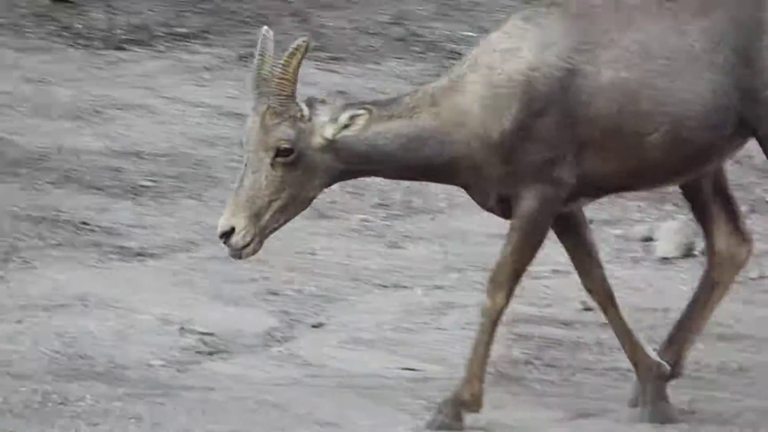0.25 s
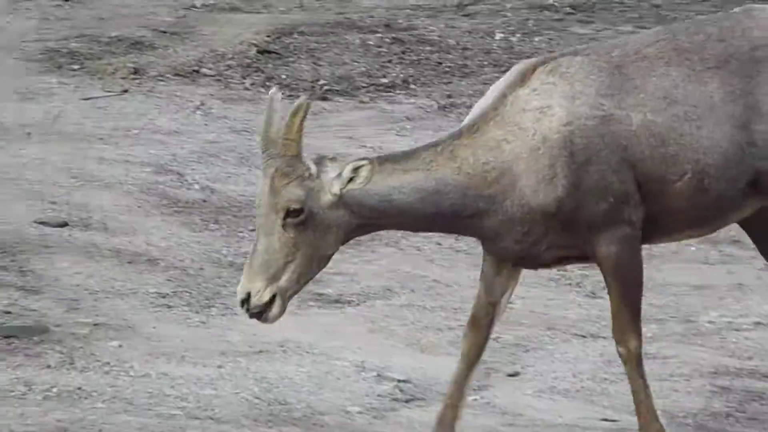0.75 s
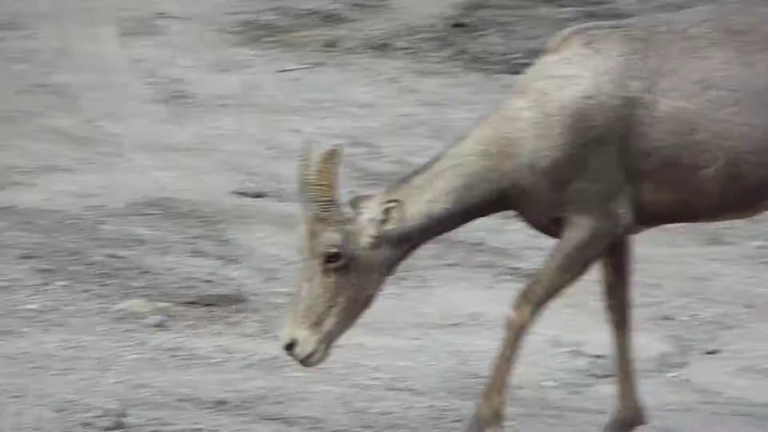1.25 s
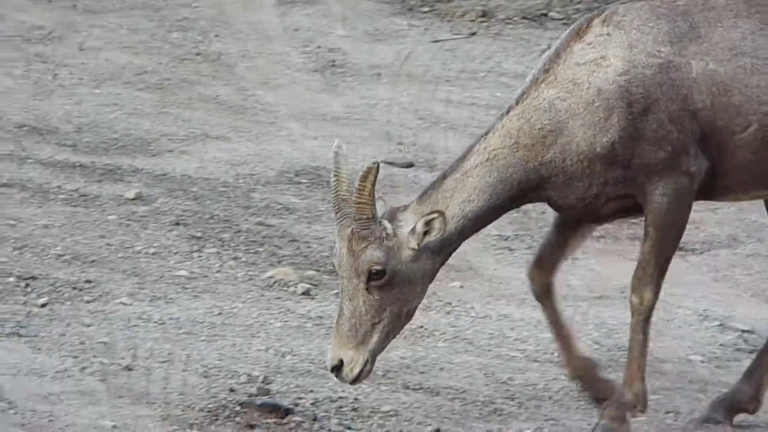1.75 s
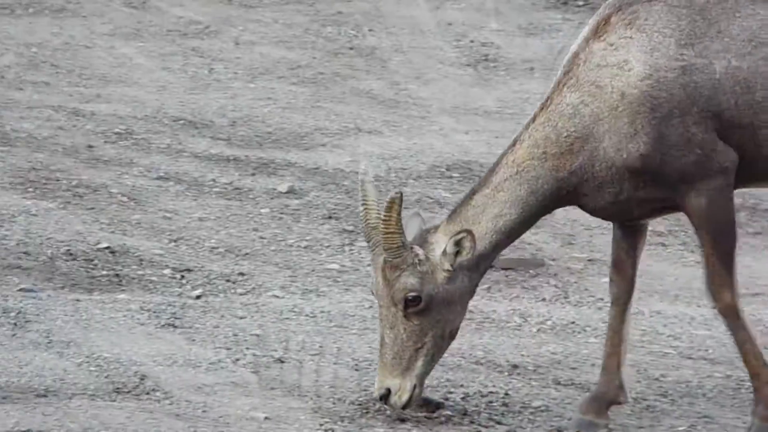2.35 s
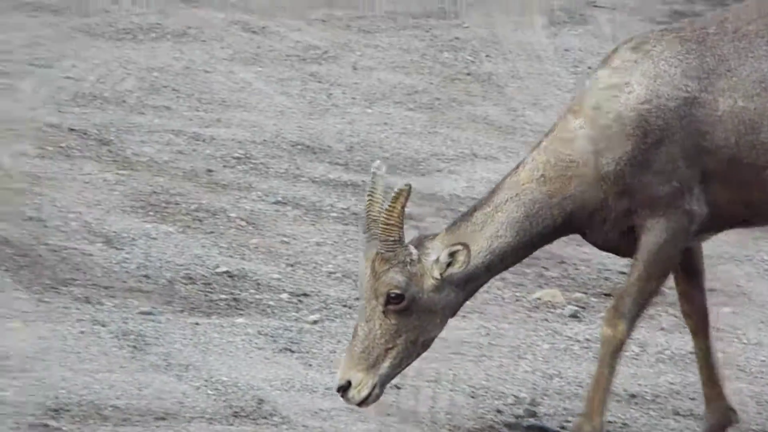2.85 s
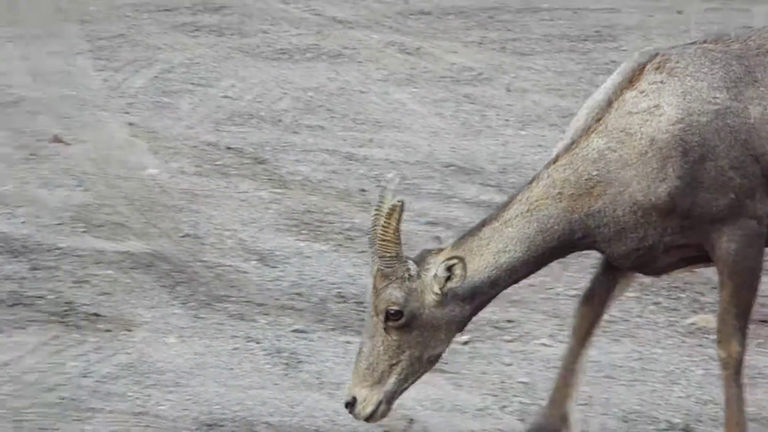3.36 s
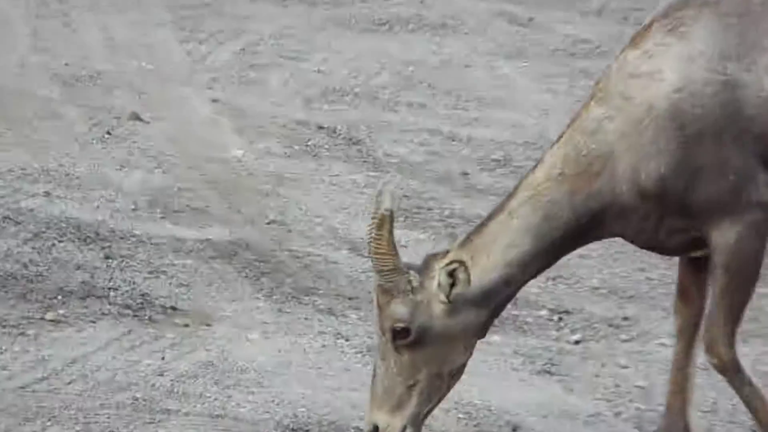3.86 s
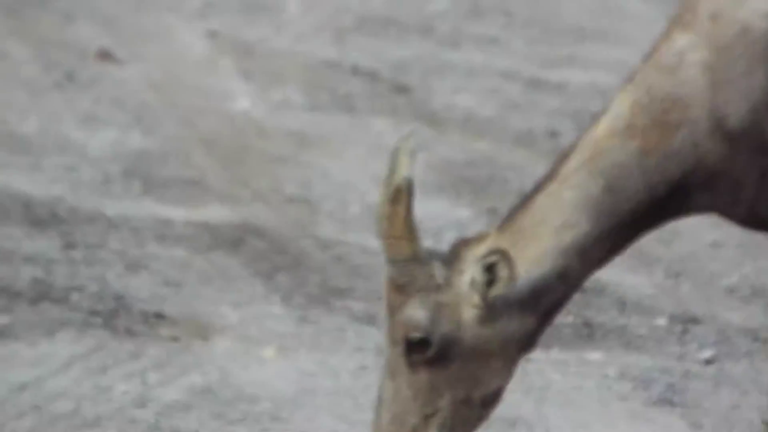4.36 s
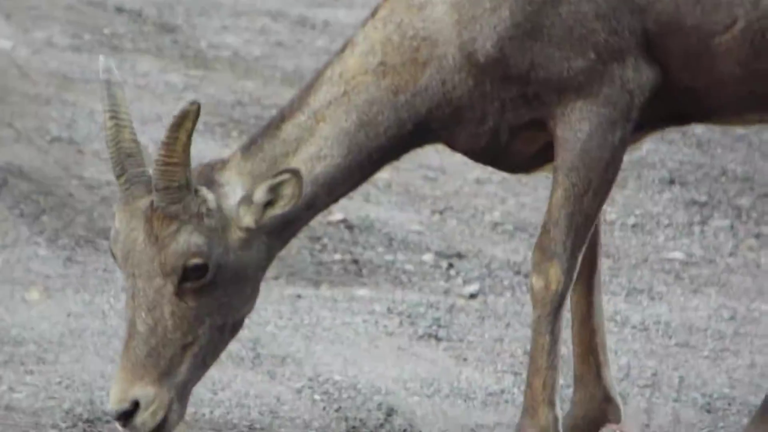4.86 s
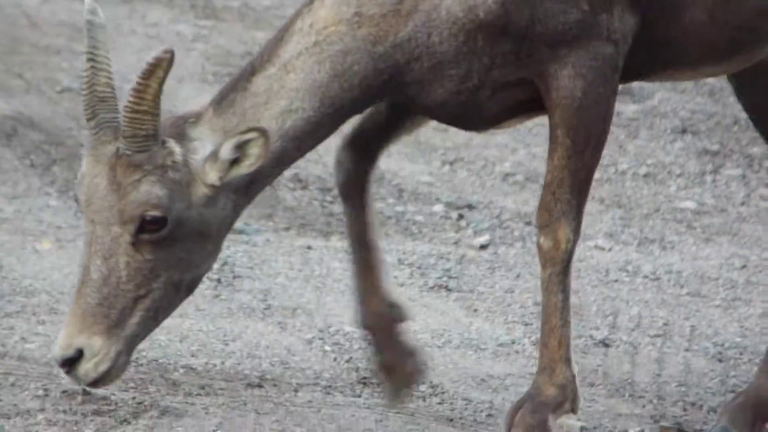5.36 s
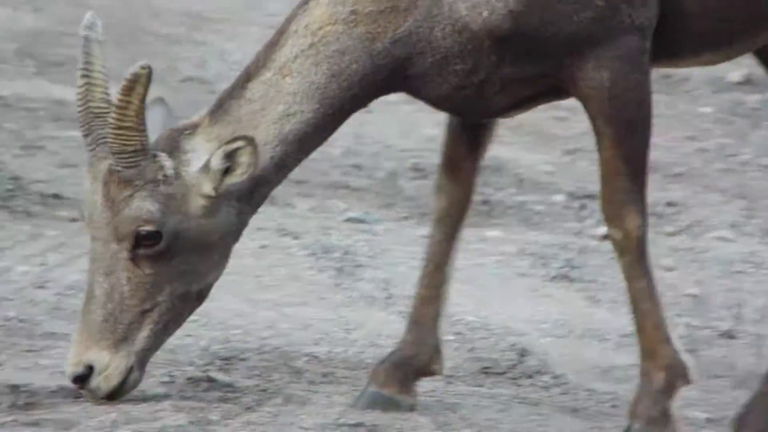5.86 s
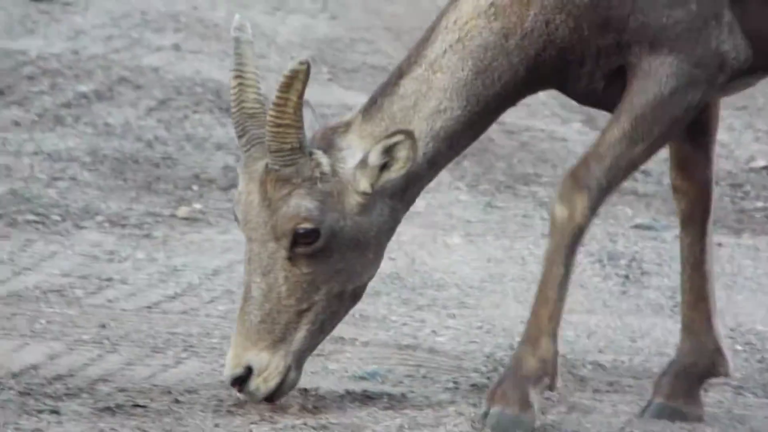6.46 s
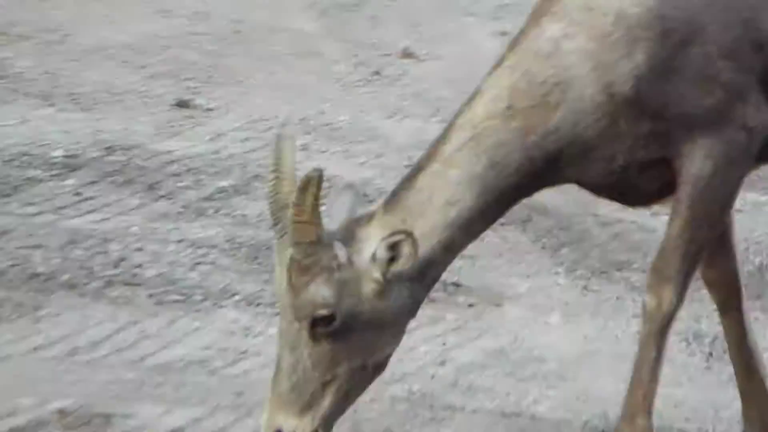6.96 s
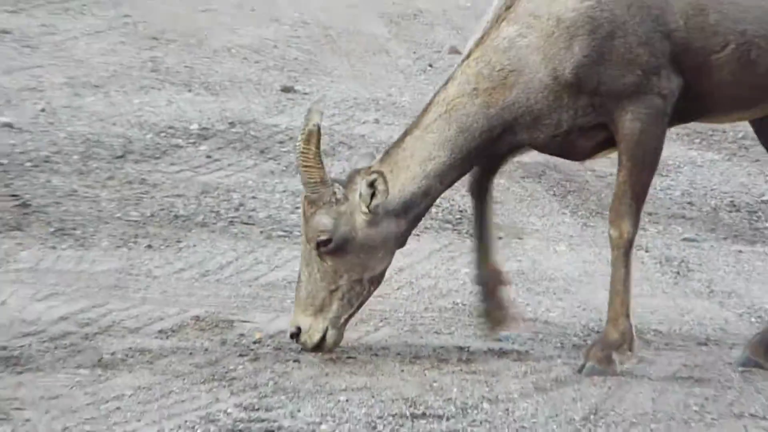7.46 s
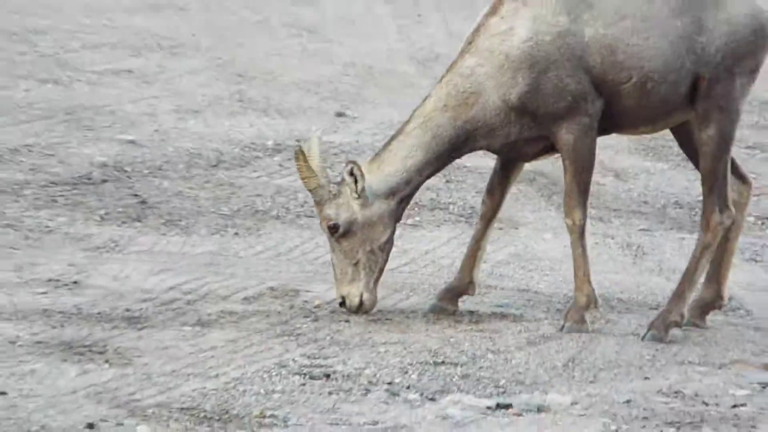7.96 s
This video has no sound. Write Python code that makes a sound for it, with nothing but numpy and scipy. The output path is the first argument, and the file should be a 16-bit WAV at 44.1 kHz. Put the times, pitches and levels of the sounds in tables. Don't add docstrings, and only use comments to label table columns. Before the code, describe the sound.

A handheld camera's own noises dominate: faint focus puffs, clicking zoom lever, hard knocks and two buzzing motor whines over distant road rumble.

```python
import sys
import numpy as np
from scipy import signal
from scipy.io import wavfile
from scipy.ndimage import uniform_filter1d

SR = 44100
rng = np.random.default_rng(int(sys.argv[2]) if len(sys.argv) > 2 else 0)


def invert_db(x):
    u = np.asarray(x, float) / 20
    return 10 ** u


def to_wav(s):
    ch = np.atleast_2d(s).T
    pcm = np.round(np.clip(ch, -1, 1) * 32767)
    wavfile.write(sys.argv[1], SR, pcm.astype(np.int16))


N = 362061

# (frequency [Hz], level [dB], t60 [s], right lag [cycles])
SHELL_MODES = [(1197, -0.5, 0.0045, -0.11), (1815, 10.5, 0.0075, -0.045), (2205, 8.5, 0.0069, 0.1),
               (2800, 7.5, 0.0038, 0.19), (4267, 0.5, 0.0045, 0.23), (4920, -3, 0.0059, -0.3),
               (5700, 7, 0.003, -0.23), (6470, 7.9, 0.0041, 0.038), (7320, -0.5, 0.0033, 0.24),
               (8040, 0.5, 0.0025, 0.208), (9570, -2, 0.0021, 0.12), (11440, -7, 0.0019, -0.4),
               (13300, -11, .003, 0.17), (520, -8, .007, 0)]
SHELL_LOW_HZ, SHELL_HIGH_HZ = 3600, 7700


def in_time(rows):
    s, *columns = np.transpose(rows)
    return [np.interp(np.arange(N) / SR, s, c) for c in columns]


def at_hz(points, hz):
    point_hz, value = np.transpose(points)
    return np.interp(np.log(hz), np.log(point_hz), value)


def rms_one(x):
    return x / np.sqrt(np.mean(x ** 2) + 1e-20)


def drift(rate_hz):
    r = np.exp(-80 * np.pi * rate_hz / SR)
    noise = rng.standard_normal(N // 40 + 2002)
    slow = signal.lfilter([1], [1, -2 * r, r * r], noise)[2000:]
    return np.interp(np.arange(N) / 40, np.arange(len(slow)), rms_one(slow))


def resonate(x, hz, width_hz):
    r = np.exp(-np.pi * width_hz / SR)
    zeros = (1 - r * r) / 2 * np.array([1, 0, -1])
    poles = [1, -2 * r * np.cos(2 * np.pi * hz / SR), r * r]
    return signal.lfilter(zeros, poles, x)


def lagged(x, hz, cycles):
    w, turn = 2 * np.pi * hz / SR, 2 * np.pi * cycles
    return signal.lfilter([np.sin(w - turn) / np.sin(w), np.sin(turn) / np.sin(w)], [1], x)


def sides(pan_db):
    return invert_db(np.array([[.5], [-.5]]) * pan_db)


def gate(start_s, stop_s, rise_s, fall_db_per_s):
    t = np.arange(N) / SR
    opening = np.clip((t - start_s) / rise_s, 0, 1) ** 2
    return opening * invert_db(-fall_db_per_s * np.clip(t - stop_s, 0, 1))


def road(patchy_db):
    # (time [s], level [dB])
    traffic_level = [(0.0, -55), (2.33, -56), (3.27, -55), (3.57, -57), (4.35, -59), (4.62, -58.5),
                     (4.8, -55.5), (5.6, -56), (6.08, -54), (6.52, -57), (8.21, -57)]
    # (frequency [Hz], level per Hz [dB])
    traffic_spectrum = [(12, -29), (20, 0), (91, -4), (218, -4.5), (289, -6), (372, -8), (440, -10.5),
                        (535, -7.5), (794, -10.5), (1740, -18.5), (4280, -27.5), (5360, -25.5),
                        (8650, -37.5), (15200, -31.5), (16500, -48)]
    # (frequency [Hz], likeness [0-1])
    likeness = [(30, 0.5), (80, 0.5), (160, .83), (400, 0.92), (900, 0.94), (2000, 0.9), (4000, .6),
                (8000, 0.7), (15000, .2)]
    hiss_db, hum_hz, hum_db, pan_db = -1, 117, -67.5, 1.4
    level_db, = in_time(traffic_level)
    out, together = 0, drift(1.5)
    edges_hz = 18 * 2 ** np.arange(0, 10.5, .5)
    white = rng.standard_normal((2, 2, N))
    for k, (low_hz, high_hz) in enumerate(zip(edges_hz, np.minimum(edges_hz[1:], 19000))):
        band = signal.butter(2, [low_hz, high_hz], "band", fs=SR, output="sos")
        mid, side = signal.sosfilt(band, white[k % 2])
        hz = np.sqrt(low_hz * high_hz)
        alike = np.clip(at_hz(likeness, hz), 0, 1)
        wander_db = patchy_db * (.5 * together + drift(8))
        gain = invert_db(at_hz(traffic_spectrum, hz) + wander_db + hiss_db * (hz > 1500))
        out = out + gain * (np.sqrt(1 + alike) * mid + np.sqrt(1 - alike) * side * [[1], [-1]])
    hum = invert_db(hum_db) * rms_one(resonate(white[0, 0], hum_hz, 4))
    return rms_one(out) * invert_db(level_db + 1.5) * sides(pan_db) + hum


def focus():
    # (time [s], level [dB])
    puffs = [(0.001, -67), (.53, -65.5), (.94, -65), (1.405, -67), (1.81, -66), (2.233, -64.5),
             (2.473, -69), (2.635, -65), (3.303, -72), (4.38, -67), (4.726, -70), (5.09, -66), (5.455, -67),
             (5.816, -67), (6.3, -68), (6.537, -69)]
    # (frequency [Hz], width [Hz], level [dB])
    drive_modes = [(5320, 710, 14.8), (6200, 580, -0.5)]
    puff_s = .08
    t = np.arange(N) / SR
    shape = 0
    for s, db in puffs:
        age = np.maximum(t - s, 0) / puff_s
        shape = shape + invert_db(db) * 9 * age * np.exp(-3.3 * age)
    mid, side = rng.standard_normal((2, N))
    pair = np.array([mid + .5 * side, mid - .5 * side]) * invert_db(2.5 * drift(40))
    rung = sum(invert_db(db) * resonate(resonate(pair, hz, w), hz, 2 * w) for hz, w, db in drive_modes)
    return shape * rms_one(rung)


def thumps():
    # (time [s], peak [dB], frequency [Hz])
    low_thuds = [
        (1.927, -46, 229),
        (3.236, -47, 202),
        (3.654, -41, 600),
        (3.726, -35, 500),
        (4.124, -38, 558),
        (5.754, -33.5, 553),
        (6.145, -36, 208),
        (6.254, -34.5, 402),
    ]
    out, t = np.zeros(N + 2000), np.arange(2000) / SR
    for s, peak_db, hz in low_thuds:
        force = invert_db(peak_db + 10 - 60 * t / 0.015) * np.minimum(t / 0.0044, 1)
        out[int(s * SR):][:2000] += force * np.sin(2 * np.pi * hz * t)
    return out[:N]


def scrapes():
    # (time [s], length [s], level [dB])
    slides = [
        (3.016, .004, -51),
        (3.05, .058, -48),
        (3.132, .032, -45.5),
        (5.79, .105, -69),
        (5.96, .01, -53),
    ]
    slips = rng.standard_normal(N) * (rng.random(N) < 4000 / SR) * invert_db(3.8 * drift(60))
    pair = 0
    for hz, db, _, cycles in SHELL_MODES[1:11]:
        share_db = -8.47 * (hz < SHELL_LOW_HZ) - 16 * (hz > SHELL_HIGH_HZ)
        rung = resonate(slips, hz, 350) * invert_db(db + share_db)
        pair = pair + np.array([rung, lagged(rung, hz, cycles)])
    touch = sum(invert_db(db) * gate(s, s + length_s, .003, 1500) for s, length_s, db in slides)
    return rms_one(pair) * touch


def contacts():
    # (time [s], peak [dB], low share [dB])
    creaks = [(.5897, -55, -5), (.855, -46, -1), (.8787, -44, 7), (.9711, -56, 6), (1.339, -45, -5),
              (1.591, -45, -9), (1.6784, -50, -3), (2.191, -55, 3), (2.246, -40, -12), (2.479, -43, 3),
              (2.691, -44, -6), (3.5115, -43, -1), (4.4546, -47, -2), (4.5228, -46, -5), (4.5557, -53, -1),
              (5.2009, -59, 6), (5.246, -44, -3), (5.8457, -52, -12), (5.8897, -44, -9),
              (6.299, -40.5, -25), (6.509, -38, -15)]
    # (time [s], peak [dB], low share [dB], high share [dB])
    first_stroke = [
        (2.857, -37, 17, -22),
        (2.9112, -19, -12, -12),
        (2.918, -30, -2, -24),
        (2.979, -35, -1, -22),
        (2.991, -21, -11, -16),
        (3.0125, -14.5, -14, -15),
        (3.044, -14.5, -11.5, -15),
        (3.127, -17, -11, -14),
        (3.163, -26, 7, -32),
        (3.178, -41, 16, -18),
    ]
    # (time [s], peak [dB], low share [dB], high share [dB])
    second_stroke = [(5.913, -25, -12, -14), (5.9157, -22.5, -9, -12), (5.9328, -20.5, -6, -11),
                     (5.9563, -22, -5, -10), (5.979, -25, -7, -13), (6.0024, -17, -9, -6),
                     (6.0063, -13.5, -12, -5), (6.0248, -17.5, -9, -10), (6.0436, -19, -7, -10),
                     (6.07, -29, -3, -15), (6.0733, -15, -14, -3), (6.0945, -20, -6, -7),
                     (6.119, -26.5, -8, -10), (6.1478, -17.5, -10, -9), (6.1779, -23.5, -4, -6),
                     (6.2089, -11.5, -13, -10), (6.2537, -19.5, -10, -6), (6.258, -34, -3, -13),
                     (6.2733, -33, 2, -25)]
    # (time [s], peak [dB], low share [dB], high share [dB], left-right [dB])
    knocks = [(1.9262, -19, -5, -22, -1), (1.9427, -40, 9, -12, 2), (3.2355, -8, -9, -5, -4),
              (3.5794, -9, -13, -7, -5), (3.6357, -40, 8, -17, -1), (3.6426, -44, 2, -20, 0),
              (4.1243, -1, -9, -12, -2), (4.1272, -1, -6, -8, -4), (4.1318, -8, -1, -7, -3),
              (4.1366, -10, -1, -17, -3), (4.2711, -30, 3, -15, -5), (5.7535, -11.5, -6, -9, -3),
              (6.639, -35, 6, -30, 2), (6.6438, -35, -14, -31, 5), (6.6743, -22, -7, -10, 1),
              (6.8867, -34, -1, -24, 0), (8.1784, -35, -16, -10, 2)]
    creak_high_db, creak_pan_db, stroke_pan_db = -12, 1.5, -4
    strokes = [(*row, stroke_pan_db) for row in first_stroke + second_stroke]
    return knocks + strokes + [(*row, creak_high_db, creak_pan_db) for row in creaks]


def clicks():
    # (peak [dB], rattle t60 [s])
    rattle_decay = [
        (-20, .013),
        (-12, .0105),
        (-2, .013),
    ]
    high_pan_db = 7
    out, t = np.zeros((2, N + 2000)), np.arange(2000) / SR
    for s, peak_db, low_db, high_db, pan_db in contacts():
        t60 = np.interp(peak_db, *np.transpose(rattle_decay))
        crack = invert_db(-60 * t / (0.32 * t60))
        tail = invert_db(-15.5 - 60 * t / (1.3 * t60))
        rattle = rng.choice([-1, 1], 2000) * (crack + tail) * np.minimum(t / 0.0003, 1)
        strengths_db, hit = rng.normal(0, 1.5, len(SHELL_MODES)), 0
        for k, (hz, db, ring_t60, cycles) in enumerate(SHELL_MODES):
            share_db = low_db if hz < SHELL_LOW_HZ else high_db if hz > SHELL_HIGH_HZ else 0
            width_hz = np.log(1000) / np.pi / ring_t60
            rung = rms_one(resonate(resonate(rattle, hz, width_hz), hz, 5.7 * width_hz))
            rung = rung * np.sqrt(width_hz) * invert_db(db + strengths_db[k] + share_db) * (-1) ** k
            pan = sides(pan_db + high_pan_db * (hz > SHELL_HIGH_HZ))
            hit = hit + np.array([rung, lagged(rung, hz, cycles)]) * pan
        i = int(s * SR)
        out[:, i:i + 2000] += hit / np.abs(hit).max(axis=1).mean() * invert_db(peak_db + 0.5)
    return out[:, :N]


def motor(run, gear, body, tooth_db, groan_db):
    tooth_base_hz, tooth_sweep, tooth_top_hz = 392.3, .38, 4000
    alike = 0.71
    groan_top_hz = 2000
    notch_hz, notch_width_hz, notch_share = 3850, 400, .7
    spin_up_s, brake_db_per_s = .009, 1800
    start_s, stop_s, level_db, surge_db, settle_s = run
    a = int(gear[0][0] * SR - SR // 20)
    b = min(N, int(gear[-1][0] * SR + SR // 20))
    t = np.arange(a, b) / SR
    turn = in_time(gear)[0][a:b]
    surge = np.exp(-np.maximum(t - start_s, 0) / settle_s)
    throb = np.cos(2 * np.pi * turn)
    glide = tooth_sweep * ((turn + .5) % 1 - .5)
    tooth_hz = tooth_base_hz * np.exp(glide + .03 * drift(11.96)[a:b])
    phase = 2 * np.pi * np.cumsum(tooth_hz) / SR
    teeth = rms_one(sum(np.cos(k * phase) for k in range(3, 13))) * (1 + throb) * (1 - surge)
    sound = 0
    for hz, width_hz, left_db, right_db, throb_db, cycles in body:
        mesh, stray = rng.standard_normal((2, b - a)) * invert_db(throb_db * throb)
        mesh = mesh + invert_db(tooth_db + throb_db) * teeth * (hz < tooth_top_hz)
        right = alike * mesh + np.sqrt(1 - alike ** 2) * stray
        pair = resonate(resonate(np.array([mesh, right]), hz, width_hz), hz, 3.0 * width_hz)
        pair = pair * invert_db(groan_db * surge * (hz < groan_top_hz))
        sound = sound + np.array([invert_db(left_db) * pair[0], invert_db(right_db) * lagged(pair[1], hz, cycles)])
    out = np.zeros((2, N))
    out[:, a:b] = rms_one(sound - notch_share * resonate(sound, notch_hz, notch_width_hz))
    out[:, a:b] *= invert_db(level_db + surge_db * surge) * gate(start_s, stop_s, spin_up_s, brake_db_per_s)[a:b]
    return out


def scene():
    # (start [s], stop [s], motor level [dB], starting surge [dB], settling [s])
    run_in = (3.634, 4.322, -42.5, 3, .04)
    run_out = (6.638, 8.3, -41, -3.5, .1)
    # (time [s], position [turns])
    gear_in = [(3.654, 0), (3.795, 2), (3.912, 4), (4.006, 6), (4.087, 8), (4.193, 10), (4.342, 14)]
    gear_out = [(6.616, 0), (6.855, 4), (7.006, 7), (7.115, 10), (7.433, 16), (7.727, 21), (7.917, 25),
                (8.033, 27), (8.214, 31)]
    # (frequency [Hz], width [Hz], left level [dB], right level [dB], throb [dB], right lag [cycles])
    body_in = [(1810, 162, -5, -11, 2.5, 0.12), (2634, 265, -20.5, -12, 1, -0.12),
               (3240, 310, -5.5, -5, 2, 0.31), (3740, 170, -11.5, -16.5, 2.1, .45),
               (4387, 67, -8.5, 3, 2.5, 0.099), (4680, 220, 5.2, -3, -1, -.03),
               (5360, 330, -1, -11, 2.3, -.2), (6000, 320, -4.5, -8, 4.5, .2),
               (6520, 375, -1, -11.5, 2.5, 0.3), (6810, 330, -9, -4, -1.5, .02),
               (7160, 300, -3.5, -18, -1, .15), (8000, 910, -25, -14.5, 3, .2),
               (9400, 710, -36, -23.5, 5, -0.066), (10980, 920, -23.5, -36.5, -4.6, -0.35),
               (12300, 900, -41.5, -31, 4.2, -0.3)]
    body_out = [(1773, 360, -27, -25, .5, -0.19), (2637, 360, -17, -12.5, 1.8, 0.23),
                (3094, 260, -15.5, -16.5, 1.8, 0.19), (3406, 200, -17, -13.5, 2.3, 0.4),
                (3850, 190, -40, -41, 2.1, .45), (4680, 130, -25, -46, 1.1, 0.16),
                (4760, 224, 2.1, -1, 0.27, 0.03), (5325, 740, -3, -24, 0.76, -0.14),
                (6350, 245, -2.5, -7, 2.1, 0.35), (6760, 490, -7.5, -8.5, 3.4, -0.077),
                (7520, 250, -10, -23, 1.8, 0.083), (8260, 490, -52, -14, 1.7, -0.29),
                (9300, 600, -26.5, -26, 0.91, 0.14), (11240, 600, -29.5, -27, 1, -0.25),
                (12500, 900, -41.5, -42, 1.1, .01)]
    handling = thumps() + scrapes() + clicks()
    zoom_in = motor(run_in, gear_in, body_in, tooth_db=-11, groan_db=0)
    zoom_out = motor(run_out, gear_out, body_out, tooth_db=-6.5, groan_db=13)
    return road(patchy_db=0.7) + focus() + handling + zoom_in + zoom_out


def low_pass(x):
    return signal.sosfilt(signal.butter(12, 16830, fs=SR, output="sos"), x)


def record(dry):
    mic_top_hz, limit_db, release_db_per_s, attack_s = 16100, -19, 128.5, 0.011
    t = np.arange(N) / SR
    dry = signal.sosfilt(signal.cheby2(10, 18, mic_top_hz, fs=SR, output="sos"), dry)
    level_db = 10 * np.log10(uniform_filter1d(np.mean(dry ** 2, axis=0), size=88) + 1e-12)
    over_db = np.maximum(level_db - limit_db, 0)
    held_db = np.maximum.accumulate(over_db + release_db_per_s * t) - release_db_per_s * t
    r = np.exp(-1 / (attack_s * SR))
    duck_db = signal.lfilter([1 - r], [1, -r], held_db)
    return low_pass(dry * invert_db(-1.6 * duck_db))


dry = scene()
out = record(dry)
to_wav(out)
```